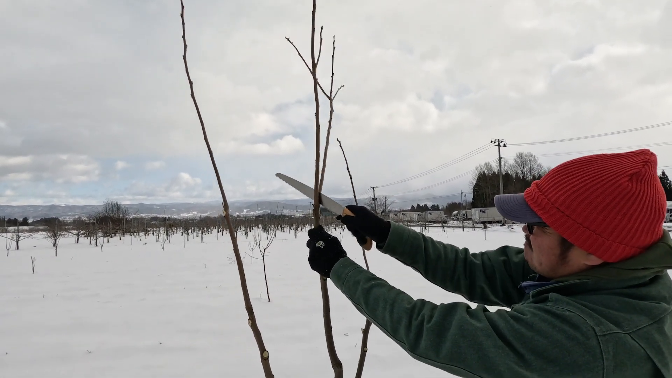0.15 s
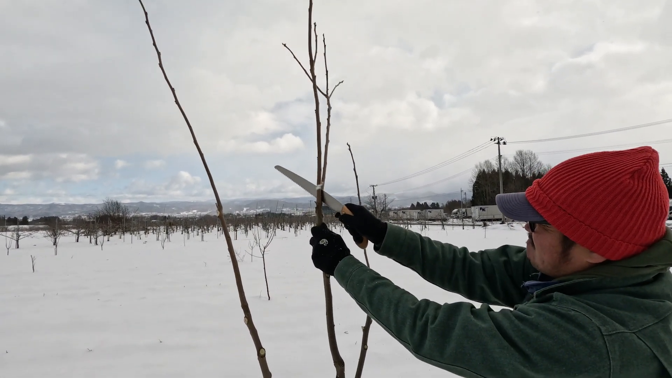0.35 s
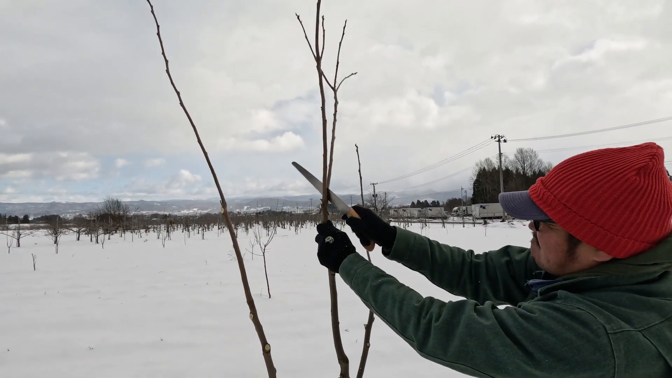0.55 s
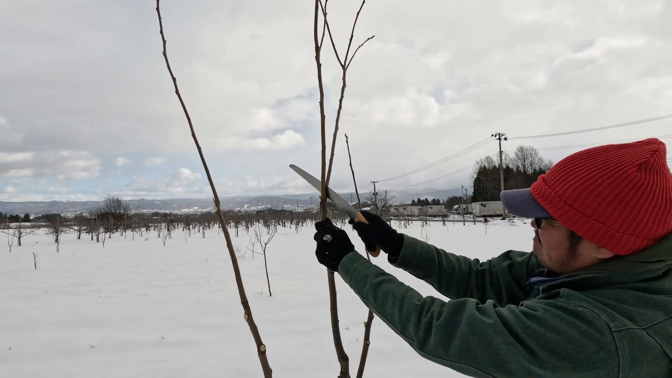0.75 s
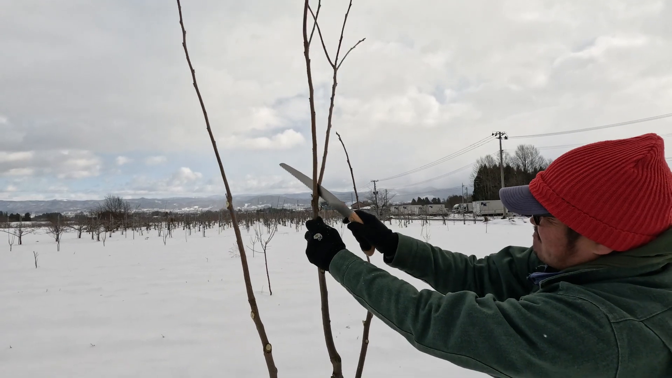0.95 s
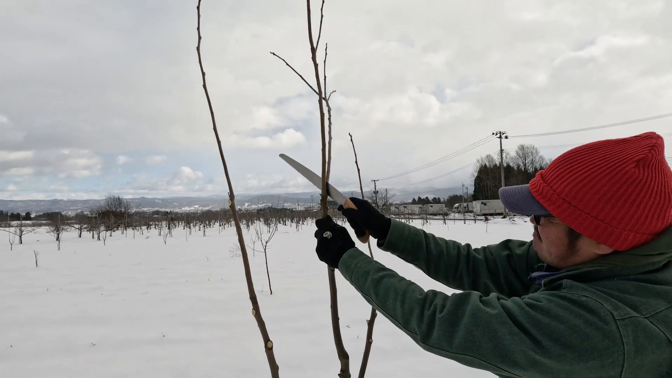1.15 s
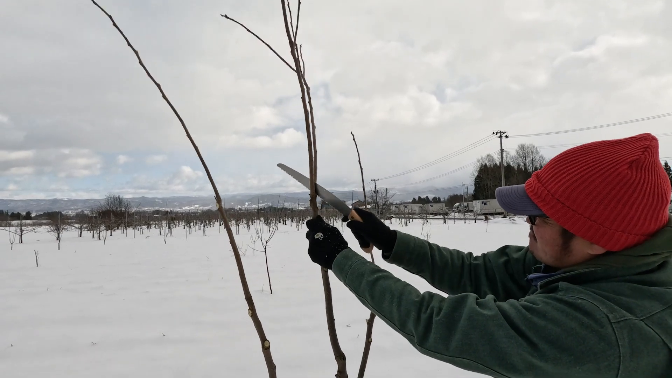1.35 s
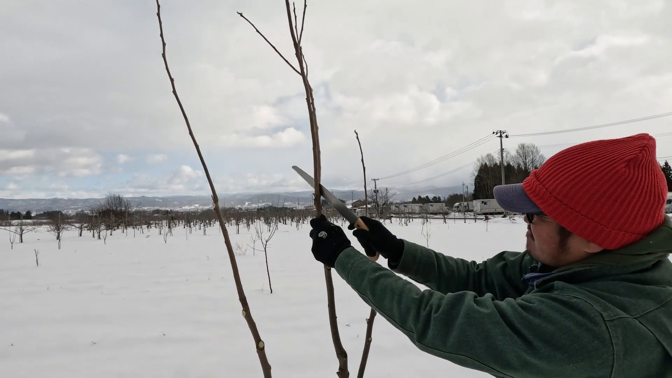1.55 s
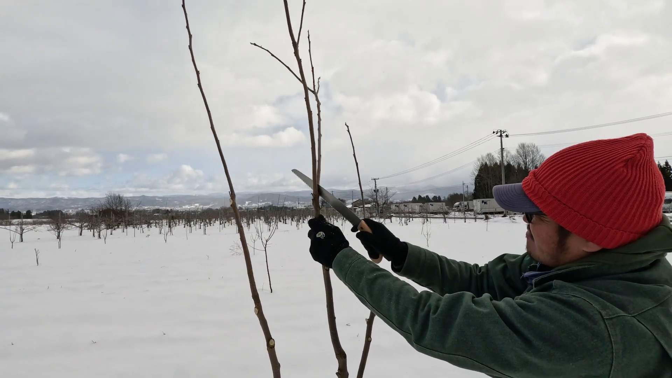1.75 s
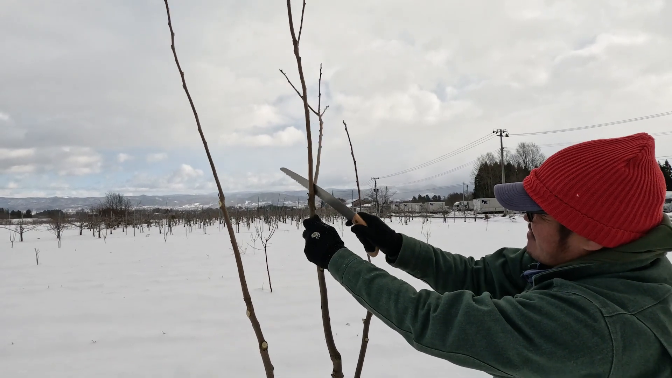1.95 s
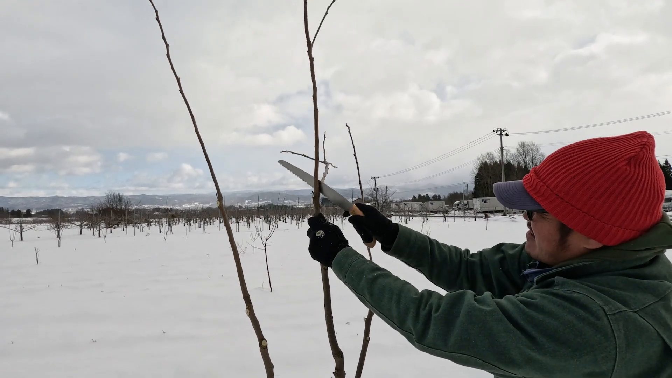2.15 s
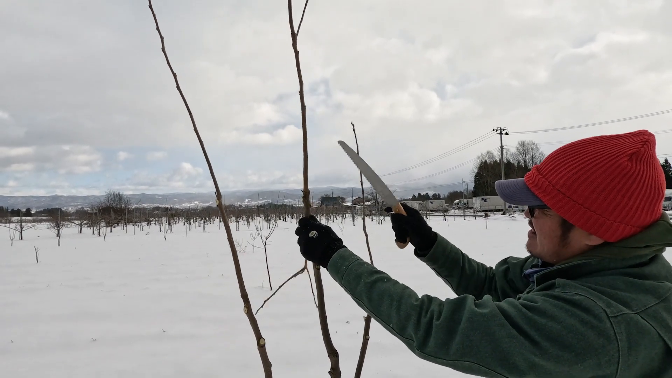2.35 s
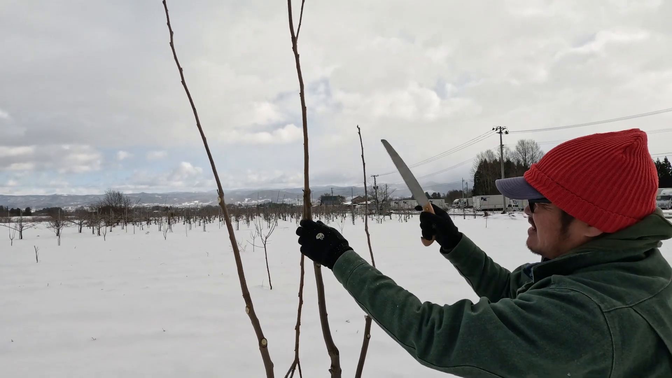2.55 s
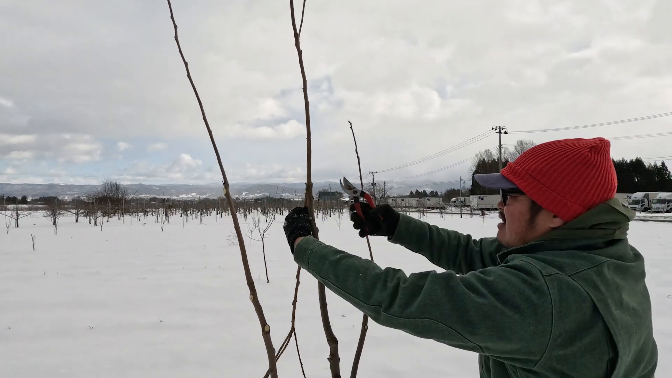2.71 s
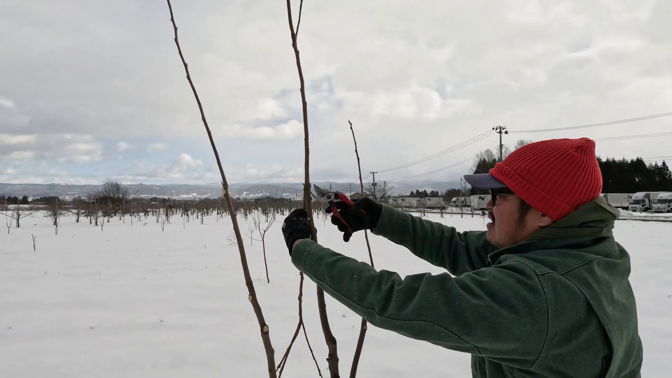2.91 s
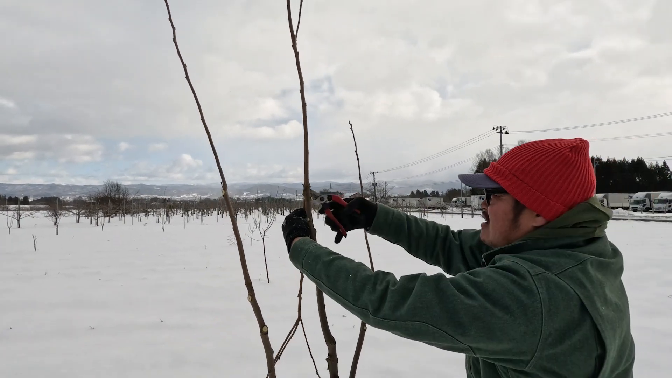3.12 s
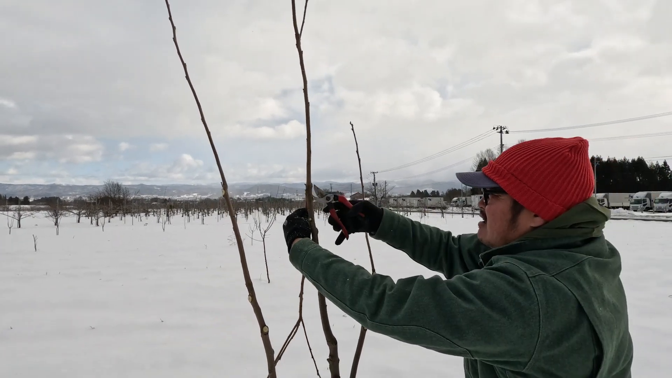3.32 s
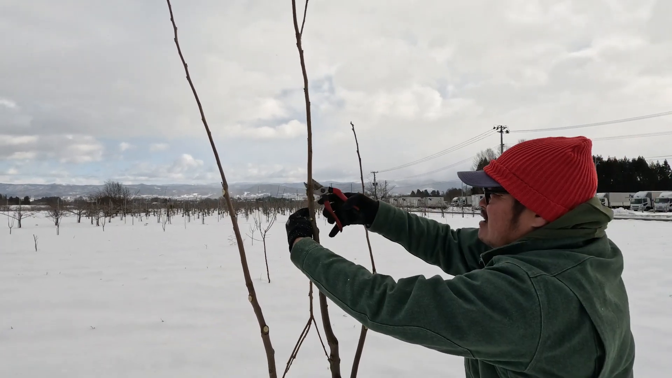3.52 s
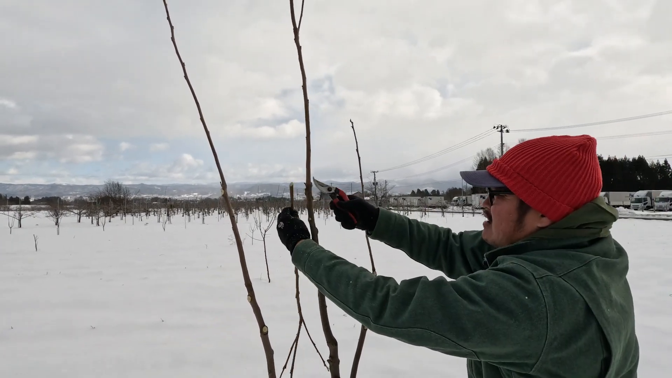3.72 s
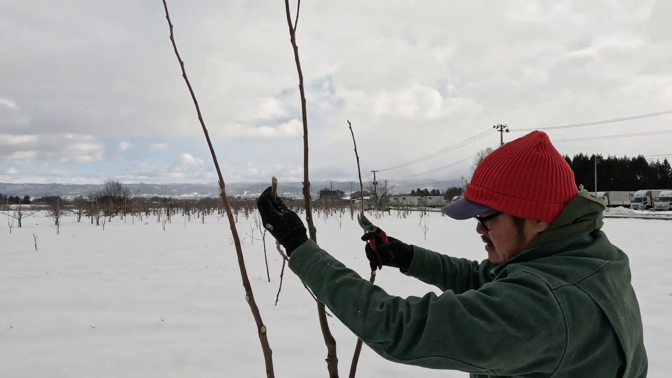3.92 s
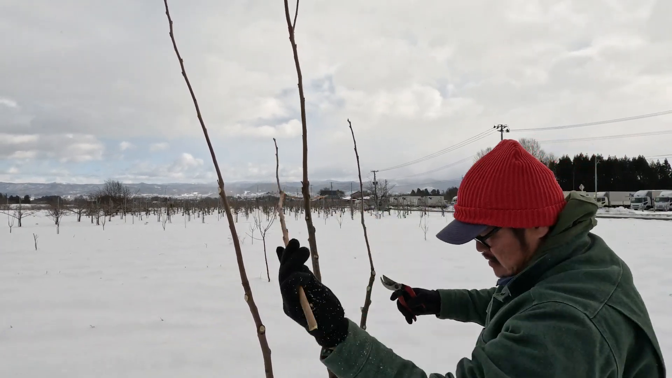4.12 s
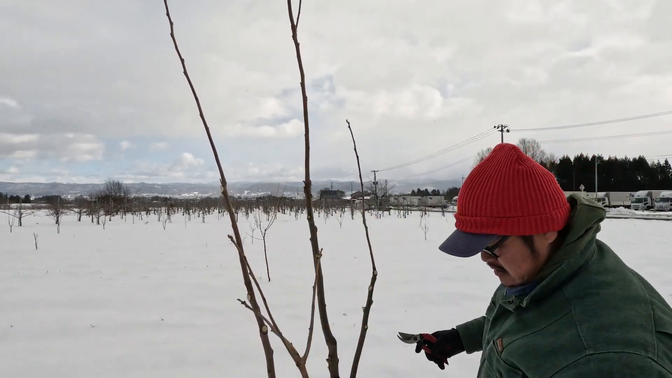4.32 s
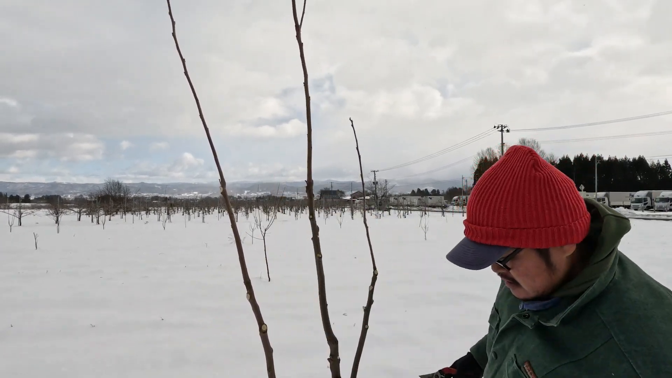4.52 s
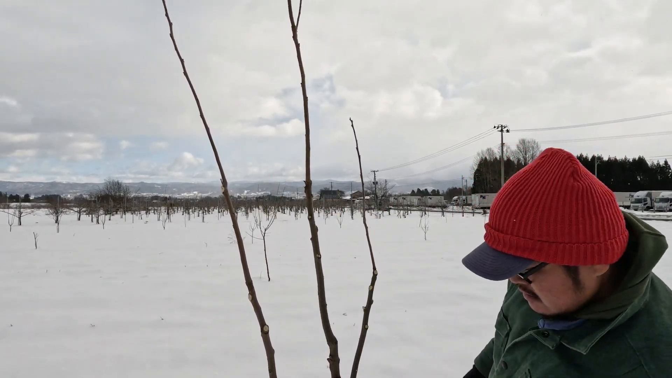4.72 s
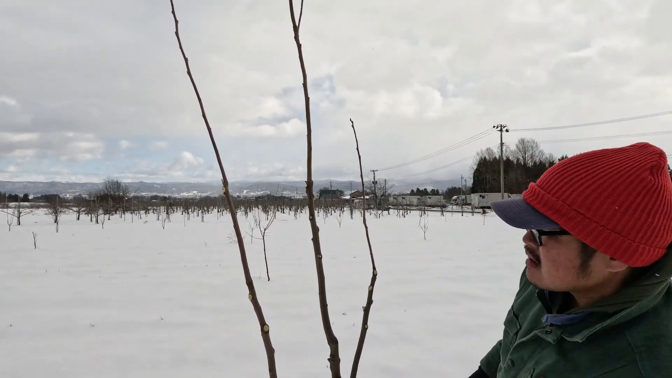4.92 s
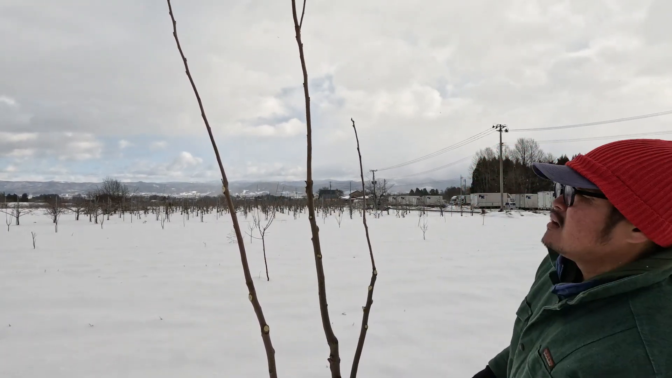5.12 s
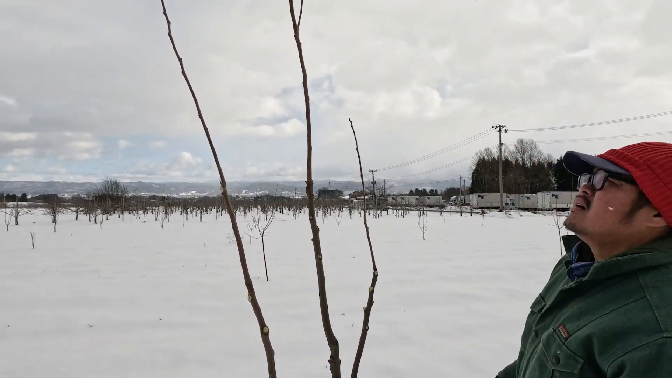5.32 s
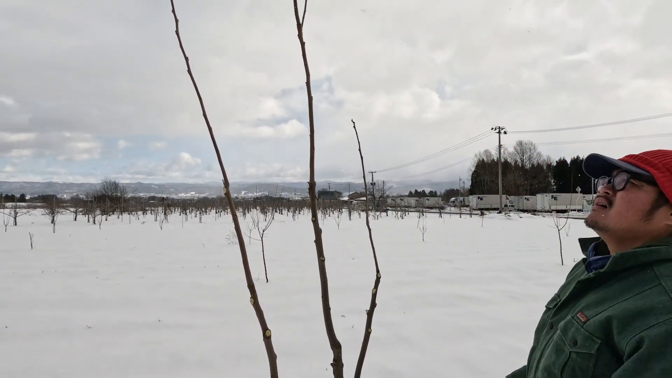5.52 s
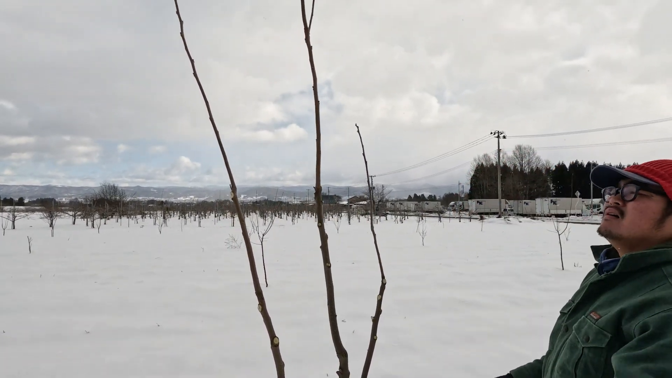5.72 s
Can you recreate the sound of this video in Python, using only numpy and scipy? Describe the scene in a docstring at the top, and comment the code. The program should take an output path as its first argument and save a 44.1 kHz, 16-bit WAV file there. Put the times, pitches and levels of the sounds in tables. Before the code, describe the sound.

In a quiet open field, fast back-and-forth strokes of a hand saw tear through a branch near the microphone, with a bright metallic ring. After about two seconds come faint clicks and one loud, sharp snip of pruning shears. A cut shoot taps down, wood cracks, and sleeves rustle softly. Light gusts rumble on the microphone, and a far bird gives a faint whistle at the end.

```python
"""In a snowy field, a folding pruning saw cuts a thin branch: its teeth tear the wood with a rasp,
the steel blade rings and the tree shudders. Then a jacket rustles as the arms move, shears click
and snap through a shoot, the shoot clatters as it falls, and twigs knock and crack.
Light wind nudges the microphone over the low hush of the open land.
A far bird calls faintly during the sawing and whistles at the end."""
import sys
import numpy as np
from scipy import signal
from scipy.fft import rfft, irfft
from scipy.io import wavfile
from scipy.ndimage import uniform_filter1d

SR = 44100
rng = np.random.default_rng(int(sys.argv[2]) if len(sys.argv) > 2 else 0)


def materialize(psi):
    """Save the field psi as 16-bit PCM at rate SR to the path in sys.argv[1].

    A 1-D psi becomes a single channel; in a 2-D psi each row is a channel.
    """
    bounded = np.clip(np.atleast_2d(psi).T, -1, 1)
    quanta = np.round(bounded * 32767).astype(np.int16)
    wavfile.write(sys.argv[1], SR, quanta)


N = 258409
TIME = np.arange(N) / SR


def gain_of(db):
    """Turns decibels into a number to multiply a sound by."""
    return 10 ** (np.asarray(db) / 20)


def fade(t, ring_s):
    """Dies away by 60 dB in ring_s seconds, the ring time."""
    return gain_of(-60 * t / ring_s)


def unit_level(x):
    """Scales a signal so that its average size (rms) is one."""
    return x / np.sqrt(np.mean(x ** 2) + 1e-20)


def follow(rows, column=1):
    """Joins the timed points of a table with straight lines."""
    rows = np.asarray(rows)
    return np.interp(TIME, rows[:, 0], rows[:, column])


def swells(rows):
    """One smooth rise and fall for each row."""
    return sum(gain_of(db) * np.exp(-((TIME - s) / half) ** 2) for s, half, db in rows)


def add(mix, start_s, sound):
    """Mixes a sound in at a given time."""
    part = mix[..., max(round(start_s * SR), 0):][..., :sound.shape[-1]]
    part += sound[..., :part.shape[-1]]


def drift(rate_hz):
    """A smooth random wobble; a higher rate makes it quicker."""
    smoothing = np.exp(-(np.fft.rfftfreq(N, 1 / SR) / rate_hz) ** 2)
    return unit_level(irfft(rfft(rng.standard_normal(N)) * smoothing, N))


def stereo_noise(width, size=N):
    """Hiss for left and right, more alike the smaller the width."""
    shared, side = rng.standard_normal((2, size))
    return np.array([shared + width * side, shared - width * side]) / np.sqrt(1 + width ** 2)


def colour(x, tone, tilt_db=0, size=4096):
    """Shapes lows and highs by a tone table; a positive tilt (dB per octave) brightens them."""
    hz = np.maximum(np.fft.rfftfreq(size, 1 / SR), 1)
    tone_hz, tone_db = np.transpose(tone)
    octaves = np.log2(np.clip(hz, 500, 9000) / 3000)
    gain = gain_of(np.interp(np.log(hz), np.log(tone_hz), tone_db) + tilt_db * octaves)
    log_gain = np.log(unit_level(np.r_[gain, gain[-2:0:-1]]))
    response = np.fft.ifft(np.exp(np.conj(signal.hilbert(log_gain)))).real  # rings only after a hit
    return signal.oaconvolve(np.atleast_2d(x), response[None], axes=1)[:, :x.shape[-1]]


def resonate(x, notes):
    """Adds the notes at which an object naturally rings."""
    return x + sum(gain_of(db) * signal.lfilter(*signal.iirpeak(hz, hz / width, SR), x)
                   for hz, width, db in notes)


# gusts of wind: (time [s], half length [s], level [dB])
GUSTS = [(.85, 0.076, -43.5), (1.14, 0.08, -37.5), (4.03, 0.32, -44), (4.58, 0.096, -40),
         (5.64, 0.065, -35.5)]
# the deep tone of the wind: (frequency [Hz], level [dB])
WIND_TONE = [(12, -3), (25, -1), (45, -9), (80, -19.5), (150, -29.5), (300, -46), (800, -86)]
# soft pushes of air: (time [s], level [dB], pitch [Hz])
THUMPS = [(3.729, -28, 58), (3.738, -29, 155), (4.284, -30.5, 37.5), (5.599, -23, 79), (5.628, -23.5, 33.2),
          (5.75, -29.5, 93), (5.798, -29, 51)]
def wind(breeze_db=-45.5, lumps_db=1.5, rise_cycles=0.33):
    """Air buffets the microphone with a lumpy rumble and a few single thumps."""
    strength = gain_of(-1) * (gain_of(breeze_db) + swells(GUSTS))
    lumpy_air = stereo_noise(0.21) * gain_of(lumps_db * drift(5))
    out = strength * unit_level(colour(lumpy_air, WIND_TONE))
    t = np.arange(SR // 5) / SR
    for s, db, hz in THUMPS:
        age = t * hz / rise_cycles
        add(out, s, gain_of(db) * age * np.exp(1 - age) * np.sin(2 * np.pi * hz * t))
    return out * gain_of([[-1], [1]])  # louder on the right


# how the hush rises and falls: (time [s], level [dB])
HUSH_LEVELS = [(2.38, -56.5), (2.56, -60.5), (3.34, -54), (5.67, -53.5), (5.86, -45.5)]
# the dull tone of the hush: (frequency [Hz], level [dB])
HUSH_TONE = [(40, 6), (120, 0), (280, 1.5), (420, -6.5), (750, -12.5), (1200, -11), (1800, -23.5),
             (3000, -45.5), (6000, -28), (11000, -54), (12000, -86)]
def field_hush(boost_db=3, wobble_db=1.7):
    """The low, gently wavering hush of open land."""
    level = gain_of(boost_db + follow(HUSH_LEVELS) + wobble_db * drift(7.9))
    return level * colour(stereo_noise(0.37), HUSH_TONE)


def swing(start, fastest, end, lag=0, sharpness=1.4):
    """The speed of a hand through one movement, from rest to rest."""
    progress = np.interp(TIME - lag, [start, fastest, end], [0, .5, 1])
    return np.abs(np.sin(np.pi * progress)) ** sharpness


def stroke(fastest, rise, fall, lag=0):
    """The saw reaches its top speed and eases off again."""
    return swing(fastest - rise, fastest, fastest + fall, lag, sharpness=2.3)


def teeth(speed, teeth_per_s=520, tear_share=0.25, scrape=0.51, grip_db=1.37):
    """Each passing tooth tears a burst of fibres, over a scrape that grips and slips."""
    teeth_passed = np.cumsum(teeth_per_s * speed * np.exp(.25 * drift(60))) / SR
    bursts = scrape + np.exp(-(teeth_passed % 1) / tear_share)
    roughness = gain_of(grip_db * drift(63.5) + 0.75 * drift(146) + drift(2800))
    return unit_level(stereo_noise(0.31) * bursts * roughness)


def slide(x, depth_db, limit, size):
    """Notes come and go as the blade slides through the cut; a small size makes them broad and brief."""
    frames = dict(nperseg=size, noverlap=size * 3 // 4)
    spectrum = signal.stft(x, **frames)[2]
    patches = rng.standard_normal(spectrum.shape[1:])
    patches = uniform_filter1d(patches, size=3, axis=0)  # smooth across pitch
    patches = uniform_filter1d(patches, size=7, axis=1)  # smooth across time
    spectrum = spectrum * gain_of(depth_db * np.minimum(unit_level(patches), limit))
    return unit_level(signal.istft(spectrum, **frames)[1][:, :N])


# pulls and pushes of the saw in turn, a pull first:
# (fastest moment [s], speeding up [s], slowing down [s], rasp level [dB], bite level [dB])
STROKES = [(0.078, 0.083, 0.07, -36, -41.5), (0.201, 0.073, 0.08, -35.5, -42),
           (0.314, 0.06, 0.11, -39, -39.5), (0.432, 0.025, 0.11, -37.5, -50.5),
           (0.554, 0.044, 0.029, -40, -41), (0.714, 0.056, 0.03, -39.5, -51),
           (0.823, 0.074, 0.036, -38.0, -41.0), (0.975, 0.068, 0.048, -36.5, -47.5),
           (1.069, 0.038, 0.058, -38.5, -41.0), (1.226, 0.059, 0.092, -39.0, -52.5),
           (1.345, 0.054, 0.078, -33, -38.5), (1.495, 0.093, 0.045, -38.0, -49),
           (1.602, 0.078, 0.086, -40, -43.5), (1.695, 0.04, 0.11, -37.5, -46),
           (1.839, 0.067, 0.08, -36, -43), (1.949, 0.056, 0.087, -34.5, -45.0),
           (2.1, 0.09, 0.056, -34.5, -43.0), (2.233, 0.11, 0.065, -41, -51),
           (2.305, 0.027, 0.047, -40, -53)]
# notes of the blade while the cut grips it: (pitch [Hz], width [Hz], level [dB])
GRIPPED_NOTES = [(580, 170, -1), (1060, 160, -9), (1320, 110, -3), (1610, 90, -3), (2620, 80, -1),
                 (3120, 70, -8), (3748, 50, 1), (4245, 70, -1), (4810, 80, -1), (5390, 70, 1),
                 (6010, 50, -2), (6340, 50, -6), (6850, 100, -5), (8800, 120, -2), (9876, 40, 8),
                 (10500, 110, -2), (11190, 90, -2)]
# the bright rasp of the teeth: (frequency [Hz], level [dB])
RASP_TONE = [(600, -18), (1500, -4), (2500, -1), (4000, 1.5), (5300, 1.5), (7000, 0), (7800, -4),
             (8500, -9), (9300, -5.5), (11000, -57.5), (12000, -65.5)]
# the lower sound of teeth digging in: (frequency [Hz], level [dB])
BITE_TONE = [(100, -11), (300, 2), (550, -0.5), (800, -6), (1100, 4.5), (1700, -5), (2500, -3), (4000, -6),
             (8000, -37.5), (12000, -66.5)]
# the very high chatter of the blade: (frequency [Hz], level [dB])
CHATTER_TONE = [(7000, -23.5), (9000, -4), (9500, -8.5), (9900, -1), (10200, -2.5), (10500, -3.5),
                (10900, -8), (11300, -10), (11700, -32), (12500, -75)]
# the deep shudder of the tree: (frequency [Hz], level [dB])
TREE_TONE = [(25, -18), (45, 5.5), (85, -1), (170, -2.5), (310, -5), (450, -11.5), (900, -21),
             (2000, -37.5), (9000, -62.5)]
# notes of the shaken tree: (pitch [Hz], width [Hz], level [dB])
TREE_NOTES = [(55, 7, 7), (76, 9, 3), (110, 11, 1), (167, 13, 4), (238, 16, 1), (305, 22, -3)]
def saw(pull_lag_s=0.02, push_lag_s=0.012, shudder_lag_s=0.0058):
    """Strokes drag the teeth through the wood; the tearing rings the blade and shakes the tree."""
    speed, rasp, bite, chatter, shudder = np.zeros((5, N))
    for k, (fastest, rise, fall, rasp_db, bite_db) in enumerate(STROKES):
        hand = stroke(fastest, rise, fall)
        lag = push_lag_s if k % 2 else pull_lag_s  # the teeth dig in late, most on a pull
        speed += hand
        rasp += gain_of(rasp_db) * hand
        chatter += gain_of(rasp_db) * hand ** 1.14
        bite += gain_of(bite_db) * stroke(fastest, rise, fall, lag)
        shudder += gain_of(bite_db) * stroke(fastest, rise, fall, lag + shudder_lag_s)
    rub = gain_of(-65) * (TIME < STROKES[-1][0])  # the blade still rubs between strokes
    ticks = tooth_ticks()
    tearing = teeth(0.26 + 0.83 * speed)
    blade = slide(resonate(tearing, GRIPPED_NOTES), depth_db=4.5, limit=1.3, size=1024)
    cutting = slide(blade, depth_db=2.6, limit=1.5, size=384)
    out = gain_of(3) * colour(cutting * (rasp + ticks + rub), RASP_TONE)
    out += gain_of(-1) * colour(cutting * (bite + rub), BITE_TONE)
    out += gain_of(-4) * colour(blade * (chatter + ticks), CHATTER_TONE)
    shaking = tearing.mean(0) * (shudder + 1.65 * rub)
    out += gain_of(0.5) * resonate(colour(shaking, TREE_TONE), TREE_NOTES)
    return (out + blade_rings() + snags()) * gain_of([[-.2], [.2]])


# teeth jerking into fresh wood: (time [s], level [dB])
TICKS = [(.031, -38), (0.144, -44), (0.42, -33.5), (0.544, -34), (.685, -50), (.767, -51), (0.801, -37),
         (.9462, -40), (1.046, -41), (1.16, -42), (1.197, -37), (1.328, -33), (1.569, -39), (1.666, -41),
         (1.791, -40), (1.918, -41), (2.033, -32), (2.186, -33), (2.297, -40)]
def tooth_ticks(rise_s=0.00088, ring_s=0.013, size=4000):
    """Brief jumps in the force on the teeth, heard in the saw as bright ticks."""
    force, t = np.zeros(N), np.arange(size) / SR
    for s, db in TICKS:
        add(force, s, gain_of(db) * fade(t, ring_s) * (1 - np.exp(-t / rise_s)))
    return force


# notes of the freely ringing blade: (pitch [Hz], level [dB], ring time [s])
BLADE_NOTES = [(3745, 0, .2), (4237, -2, .09), (4778, -1, .12), (5390, -4, .08), (6002, -4, .1),
               (6627, -6, .09), (8839, -11, .12), (9874, -2, .1), (10495, -7, .05), (11200, -8, .07)]
# a tooth catches and one note sings: (time [s], pitch [Hz], level [dB], ring time [s])
CATCHES = [(.072, 3745, -29.5, 0.27), (.177, 3745, -29, 0.14), (.208, 9800, -30.5, .08),
           (.301, 3770, -30, 0.14), (.327, 3700, -31.5, 0.23), (.422, 3745, -31.5, 0.068),
           (.47, 4920, -32, 0.07), (0.552, 3743, -30, 0.067), (.554, 9874, -36.5, .11),
           (.712, 9870, -43, 0.073), (.812, 3720, -31, 0.052), (.829, 3747, -33, 0.059),
           (0.967, 4880, -36, 0.043), (1.07, 9880, -29, .07), (1.087, 5380, -33.5, 0.04),
           (1.329, 9790, -24.5, .1), (1.347, 3730, -21, 0.092), (1.352, 5385, -22.5, 0.053),
           (1.358, 9874, -30.5, 0.09), (1.497, 9850, -29, .094), (1.611, 3740, -31, 0.073),
           (1.811, 9874, -31, 0.11), (1.824, 3745, -33.5, .12), (1.855, 4770, -27.5, 0.048),
           (1.858, 3745, -33.5, .27), (1.94, 5396, -27, 0.1), (1.946, 3745, -28, 0.14),
           (1.971, 9874, -29.5, 0.12), (2.071, 3740, -29, .1), (2.079, 9874, -30, 0.091),
           (2.097, 5370, -24.5, 0.091), (2.101, 3741, -32, .24), (2.231, 3794, -31, 0.063),
           (2.25, 9874, -32, 0.061), (2.252, 5390, -30, 0.043), (2.297, 3772, -35, 0.18),
           (2.304, 9760, -39, 0.12), (2.308, 4840, -27, 0.1), (2.311, 5890, -46, 0.048)]
def blade_rings(others_db=-15, rise_s=0.0026, choke_s=0.02, size=14000):
    """A catching tooth rings one note of the steel and stirs the rest, until the wood clamps the blade."""
    out, t = np.zeros(N), np.arange(size) / SR
    jostle_db, waver = 1.4 * drift(70), .0009 * drift(60)  # the wood jostles level and pitch
    grips = [fastest - .75 * rise for fastest, rise, *_ in STROKES]  # early in each stroke
    onset = 1 - np.exp(-t / rise_s)
    for s, sung_hz, db, sung_ring_s in CATCHES:
        span = slice(round(s * SR), round(s * SR) + size)
        wavering_time = np.cumsum(1 + waver[span]) / SR + rng.random()
        free_s = min([grip for grip in grips if grip > s], default=TIME[-1]) - s
        choke = fade(np.maximum(t - free_s, 0), choke_s)
        level = gain_of(db - 0.5 + jostle_db[span]) * onset * choke
        nearest = np.argmin([abs(hz - sung_hz) for hz, _, _ in BLADE_NOTES])
        notes = [(hz, others_db + note_db, ring_s) for hz, note_db, ring_s in BLADE_NOTES]
        notes[nearest] = (sung_hz, 0, sung_ring_s)
        for hz, note_db, ring_s in notes:
            note = np.sin(2 * np.pi * hz * wavering_time)
            add(out, s, level * gain_of(note_db) * fade(t, ring_s) * note)
    return out


# the saw snagging on a pull: (time [s], level [dB])
SNAGS = [(.081, -29.5), (.097, -30.5), (.322, -26), (.347, -25), (.373, -29), (.55, -30.5), (.558, -29),
         (.821, -29), (.831, -26.5), (1.078, -38), (1.089, -28), (1.356, -36), (1.38, -34.5),
         (1.398, -33.5), (1.6, -34), (1.624, -35), (1.86, -29.5), (1.872, -30), (2.111, -36)]
# the dull knock of the branch: (frequency [Hz], level [dB])
KNOCK_TONE = [(50, -18.5), (150, 8.5), (300, -2), (550, -2), (900, 1), (1400, -1), (2500, -4.5),
              (5000, -9.5), (9000, -38), (12500, -63)]
def snags(ring_s=0.028, snap=3.6, size=9000):
    """A slowing pull snags and knocks the branch, and the knock rings on in the stem."""
    out, decay = np.zeros((2, N)), fade(np.arange(size) / SR, ring_s)
    for s, db in SNAGS:
        blow = stereo_noise(0.11, size) * decay
        blow[:, 0] += snap
        knock = unit_level(resonate(colour(blow, KNOCK_TONE), TREE_NOTES))
        add(out, s, gain_of(db) * knock * np.sqrt(np.mean(decay ** 2)))
    return out


# two falling bird calls, one list each: (time [s], pitch [Hz], level [dB])
FAR_CALLS = [
    [(.57, 1280, -64), (.63, 1250, -56.5), (.68, 1227, -55.5)],
    [(5.63, 1425, -64), (5.67, 1245, -54), (5.71, 1186, -56), (5.76, 1087, -63)],
]
# the higher whistle at the end: (time [s], pitch [Hz], level [dB])
WHISTLE = [(5.772, 2630, -93), (5.79, 2450, -55.5), (5.815, 2438, -57.5), (5.838, 2536, -50),
           (5.86, 2440, -59)]
def bird_call(rows, octave_db, waver=0.0036):
    """A bird sings a thin gliding note, with a second tone an octave above."""
    singing = (TIME > rows[0][0]) & (TIME < rows[-1][0])
    level = uniform_filter1d(singing.astype(float), size=300) * gain_of(follow(rows, column=2))
    pitch_hz = follow(rows) * (1 + waver * drift(70))
    phase = 2 * np.pi * np.cumsum(pitch_hz) / SR
    return level * (np.sin(phase) + gain_of(octave_db) * np.sin(2 * phase))


# movements of the arms: (start [s], fastest moment [s], end [s], level [dB])
ARM_MOVES = [(2.2, 2.495, 2.81, -64.5), (2.751, 2.77, 3.075, -58), (3.582, 3.59, 3.7, -60.5),
             (3.665, 3.73, 3.81, -53.5), (3.88, 4.085, 4.37, -58), (4.062, 4.42, 4.89, -60.5),
             (4.738, 5.215, 5.42, -57), (5.29, 5.41, 5.52, -58.5), (5.398, 5.694, 6.17, -68)]
# the fine hiss of rubbing cloth: (frequency [Hz], level [dB])
CLOTH_TONE = [(880, -5), (1500, 0), (1860, -2), (1980, -3), (5580, -5), (8250, -11.5), (9910, -13),
              (11200, -36.5), (12000, -81), (15600, -92.5), (22000, -120)]
# heavier scuffs of the sleeves: (time [s], half length [s], level [dB])
SCUFFS = [(4.468, 0.1, -60), (5.192, 0.076, -52), (5.29, 0.094, -54.5), (5.436, 0.017, -60),
          (5.62, 0.042, -55.5), (5.817, 0.11, -59.5)]
# the duller tone of those scuffs: (frequency [Hz], level [dB])
SLEEVE_TONE = [(150, -2), (400, -5), (650, -1), (900, -10), (1400, -0.5), (2000, -8.5), (3500, -16),
               (9000, -50), (12000, -75)]
def jacket(still_db=-72.5, grain_db=2.0, folds_db=1.54):
    """Cloth rubs louder as the arms move faster, and scuffs where the sleeves drag."""
    rubbing = unit_level(stereo_noise(0.41) * gain_of(grain_db * drift(900)))
    motion = sum(gain_of(db) * swing(start, fastest, end) for start, fastest, end, db in ARM_MOVES)
    level = (gain_of(still_db) + motion) * gain_of(folds_db * drift(32))
    return level * colour(rubbing, CLOTH_TONE) + swells(SCUFFS) * colour(rubbing, SLEEVE_TONE)


# the tone of cracking wood: (frequency [Hz], level [dB])
WOOD_TONE = [(100, 1.5), (400, -4), (750, -11), (1050, -7), (1400, -3), (2200, -2), (2800, -0.5),
             (3700, -2), (4600, -5.5), (5500, -2), (7000, -7.5), (8500, -12.5), (10500, -14), (12500, -42)]
# notes of a struck shoot: (pitch [Hz], width [Hz], level [dB])
SHOOT_NOTES = [(1020, 200, 2), (1300, 180, 8), (1500, 160, 4), (1720, 200, 2), (2010, 200, 6),
               (3390, 240, -1), (3640, 220, 0), (4290, 200, -1), (5190, 200, -3), (6950, 450, 4)]
def crack(ring_s, tilt_db, splinter_db=2, snap=3.6, rise_s=.0002, size=8000):
    """A sharp snap, then a dying spray like splintering fibres; a short, faint one is a click."""
    t = np.arange(size) / SR
    decay = fade(t, ring_s) * (1 - np.exp(-t / rise_s))
    splinters = unit_level(uniform_filter1d(rng.standard_normal(size), size=30))
    burst = unit_level(stereo_noise(0.11, size) * gain_of(splinter_db * splinters)) * decay
    burst[:, np.argmax(decay)] += snap
    ringing = resonate(colour(burst, WOOD_TONE, tilt_db), SHOOT_NOTES)
    return unit_level(ringing) * np.sqrt(np.mean(decay ** 2))


# cracks and knocks of wood, and small clicks of the shears:
# (time [s], level [dB], ring time [s], brightness [dB per octave], left over right [dB])
CRACKS_AND_CLICKS = [(2.6959, -38.5, 0.065, -1, 2.5), (3.085, -55, 0.012, 4.5, 14),
                     (3.2, -49.5, 0.011, -2, 1), (3.7065, -27.5, 0.012, 0.5, -4.5),
                     (3.709, -37, 0.021, 0, 3), (3.7297, -16, 0.0082, 4, 4), (3.7328, -24.5, .02, 7, 0),
                     (3.7385, -6.5, 0.01307, 1.1, -3.5), (3.7439, -16.5, 0.0072, -2, 4),
                     (4.369, -36.5, 0.02, 8, 2.5), (4.384, -42, 0.023, -1, 0), (4.397, -41, 0.033, 0.5, -4),
                     (4.4093, -29.5, 0.014, 2, 2.5), (4.416, -36.5, 0.031, 1, -7),
                     (4.426, -36, 0.051, 0, -2), (4.445, -38.5, 0.066, 3, 3),
                     (5.2293, -23, 0.021, -1.5, 0.5), (5.2365, -27.5, 0.019, -2, 3),
                     (5.2424, -28.5, 0.023, 1, 3), (5.2444, -34, 0.084, 0.5, 0),
                     (5.266, -42, 0.077, 3.5, 3)]
def cracks_and_clicks(rebound_db=-8.5):
    """Wood cracks and knocks and the shears click; each rebounds a moment later on the other side."""
    out = np.zeros((2, N))
    for s, db, ring_s, tilt_db, left_db in CRACKS_AND_CLICKS:
        sides = gain_of(db) * gain_of([[left_db / 2], [-left_db / 2]])
        add(out, s, sides * crack(ring_s, tilt_db))
        delay_s = .003 + .14 * ring_s  # a longer sound rebounds later
        add(out, s + delay_s, gain_of(rebound_db) * sides[::-1] * crack(ring_s, tilt_db))
    return out


# taps of the falling shoot: (time [s], level [dB])
TAPS = [(4.2702, -35.5), (4.2748, -34), (4.2832, -38), (4.291, -47)]
# the tone of a dry stick: (frequency [Hz], level [dB])
STICK_TONE = [(200, -16), (700, -14), (1200, -2), (2000, -2), (2600, 0.5), (3200, -4), (4000, -7),
              (4500, -24), (5600, -7), (6400, -8.5), (7600, -17), (8500, -34), (10300, -11), (12000, -38)]
# notes of the loose shoot: (pitch [Hz], width [Hz], level [dB])
STICK_NOTES = [(1285, 70, 2), (1610, 70, 3), (2290, 70, 3), (2740, 90, 0), (3620, 150, -2), (5700, 80, 3),
               (6350, 90, 1)]
def falling_shoot(ring_s=0.044, size=6000):
    """The cut shoot taps a few times in quick succession and rings like a dry stick."""
    blows, decay = np.zeros((2, N)), fade(np.arange(size) / SR, ring_s)
    for s, db in TAPS:
        add(blows, s, gain_of(db) * stereo_noise(0.2, size) * decay)
    return resonate(colour(blows, STICK_TONE), STICK_NOTES)


def outdoors(x, echo_db, ring_s, size=12000):
    """Snow and trees scatter a faint echo back, different on each side."""
    t = np.arange(size) / SR
    tail = rng.standard_normal((2, size)) * fade(t, ring_s) * (t > .004)
    echo = signal.oaconvolve(x, tail / np.linalg.norm(tail[0]), axes=1)[:, :N]
    return x + gain_of(echo_db) * echo


def scene():
    """Saw, shears, wood and cloth close by, with wind, hush and bird calls around them."""
    birds = bird_call(WHISTLE, octave_db=-1) + sum(bird_call(rows, octave_db=-29) for rows in FAR_CALLS)
    sawing = outdoors(saw(), echo_db=-26.5, ring_s=0.49)
    pruning = outdoors(cracks_and_clicks() + falling_shoot(), echo_db=-30.5, ring_s=0.22)
    return sawing + pruning + jacket() + wind() + field_hush() + birds


def record(dry, cutoff_hz=12600):
    """Rounds off the hardest snap, then removes the highest treble."""
    low_pass = signal.firwin(511, cutoff_hz, window=("kaiser", 9), fs=SR)
    return signal.oaconvolve(np.tanh(dry), low_pass[None], "same", axes=1)


dry = scene()
out = record(dry)
materialize(out)
```